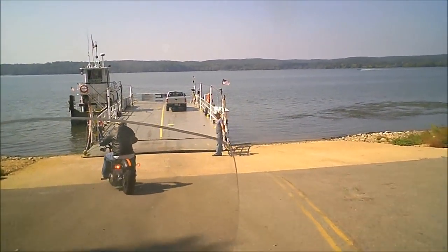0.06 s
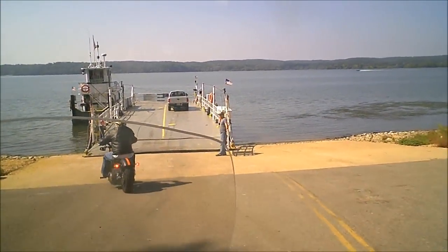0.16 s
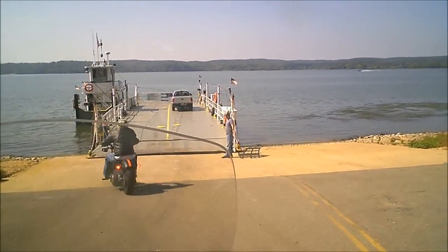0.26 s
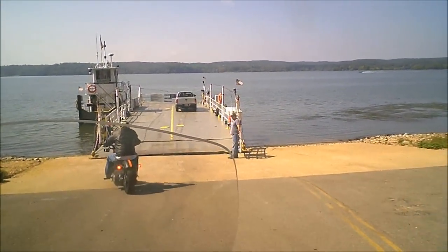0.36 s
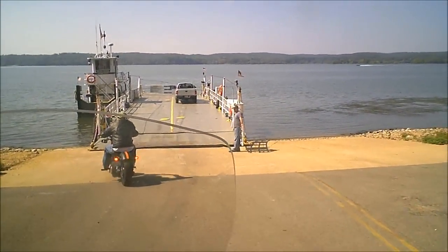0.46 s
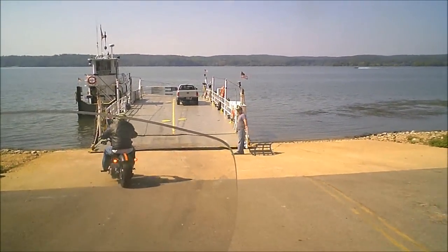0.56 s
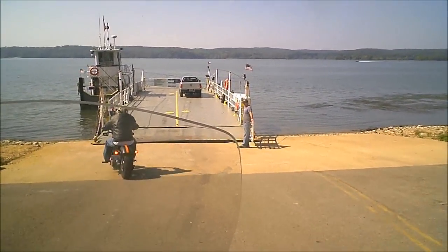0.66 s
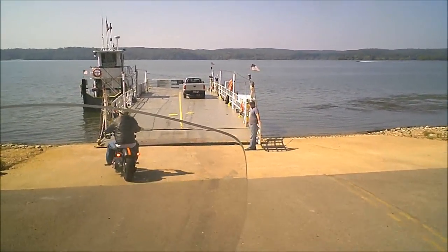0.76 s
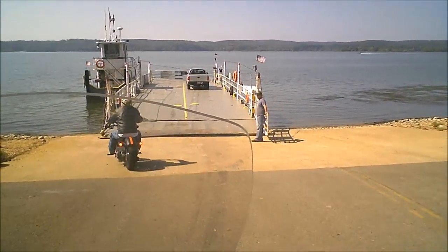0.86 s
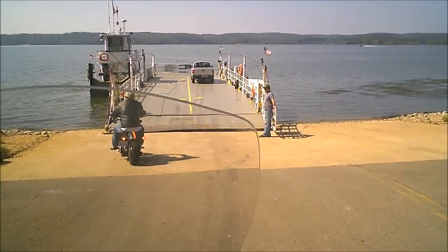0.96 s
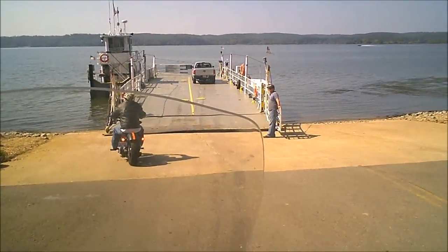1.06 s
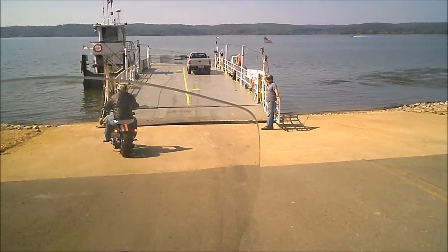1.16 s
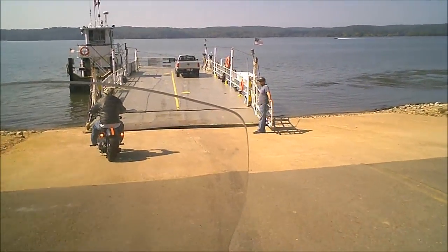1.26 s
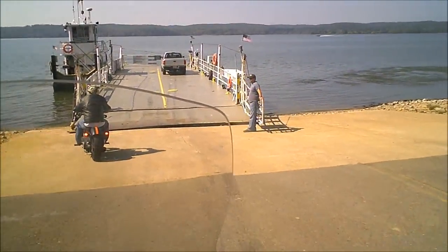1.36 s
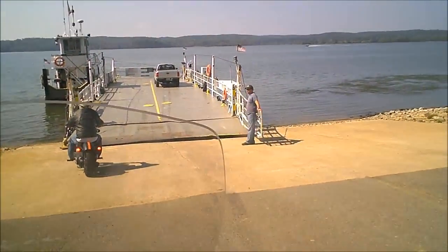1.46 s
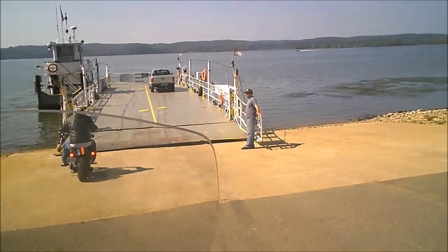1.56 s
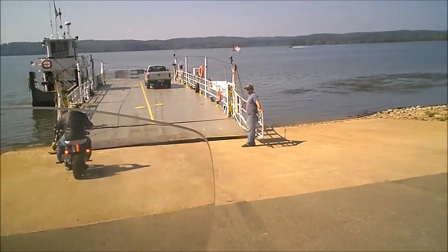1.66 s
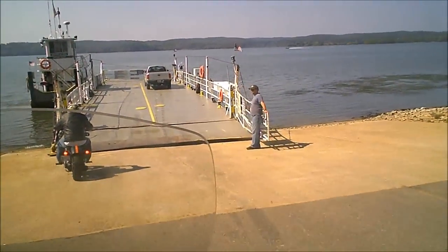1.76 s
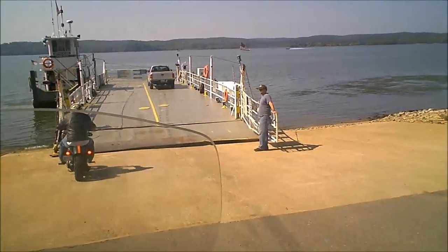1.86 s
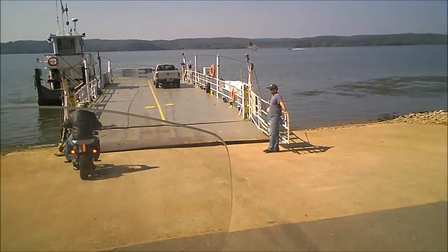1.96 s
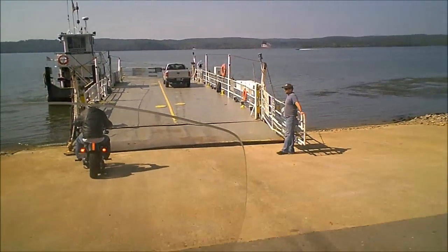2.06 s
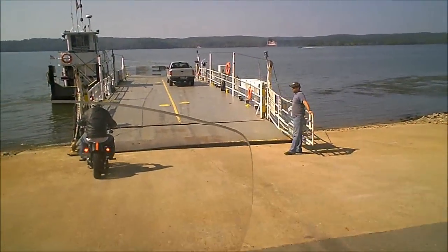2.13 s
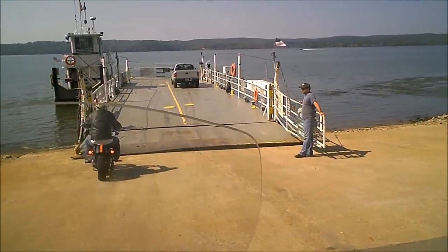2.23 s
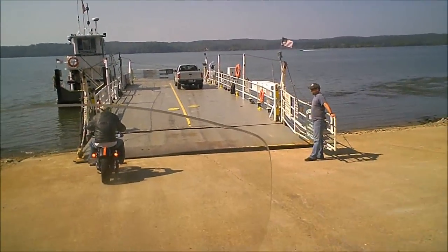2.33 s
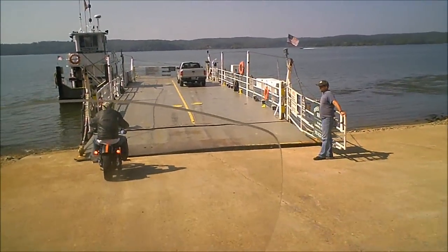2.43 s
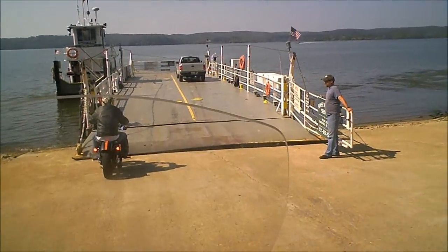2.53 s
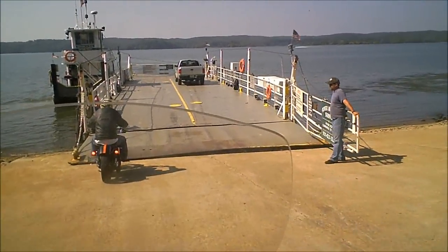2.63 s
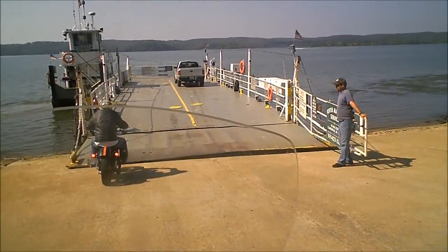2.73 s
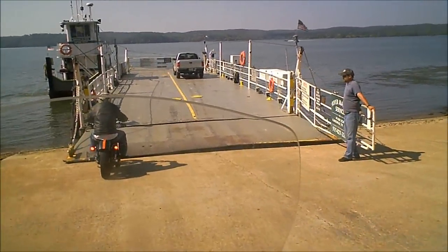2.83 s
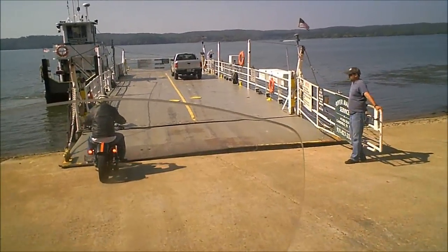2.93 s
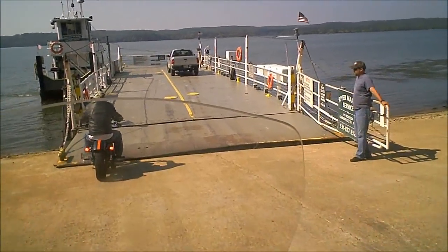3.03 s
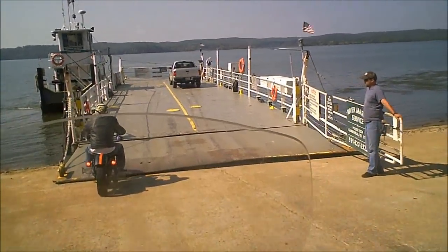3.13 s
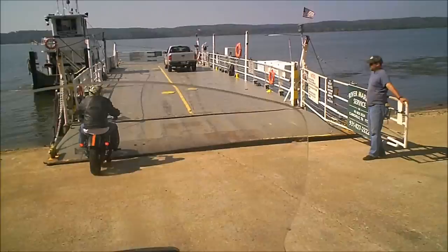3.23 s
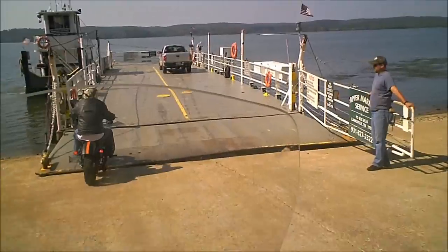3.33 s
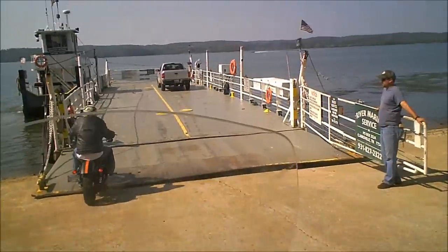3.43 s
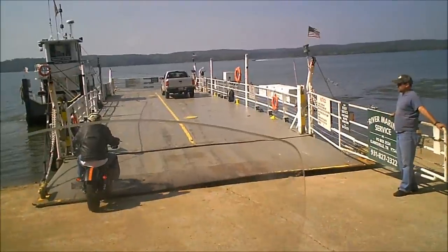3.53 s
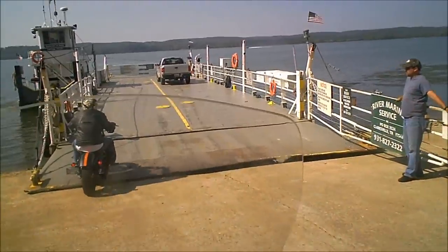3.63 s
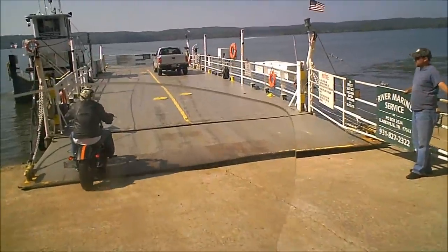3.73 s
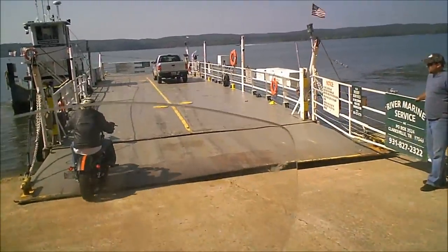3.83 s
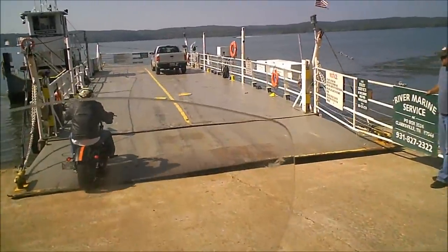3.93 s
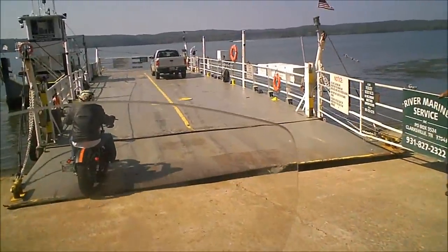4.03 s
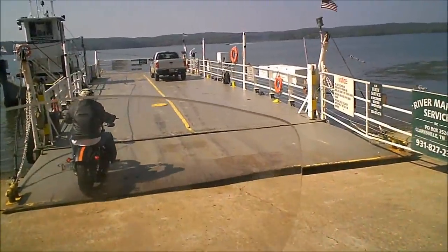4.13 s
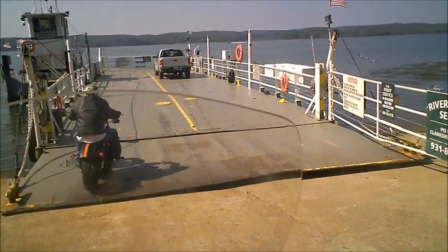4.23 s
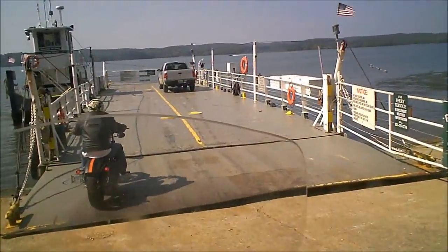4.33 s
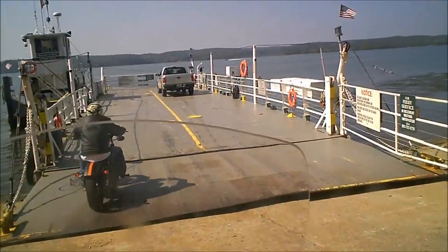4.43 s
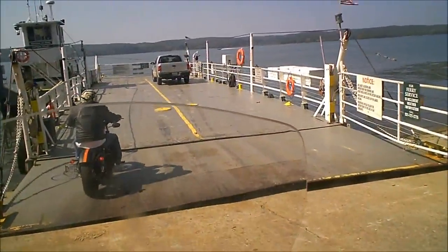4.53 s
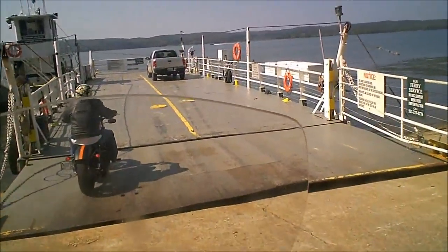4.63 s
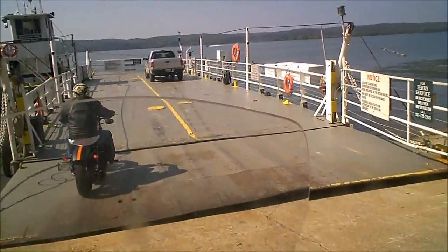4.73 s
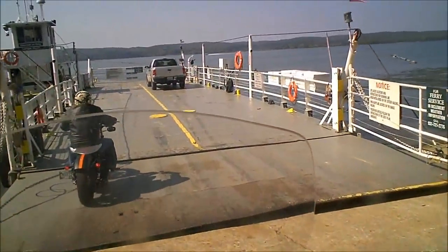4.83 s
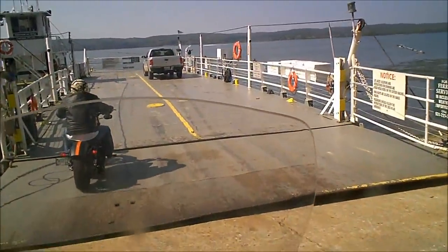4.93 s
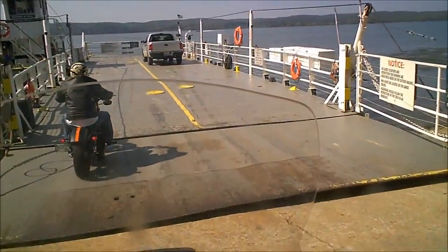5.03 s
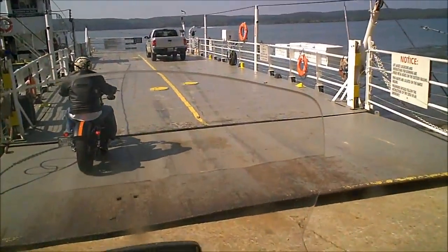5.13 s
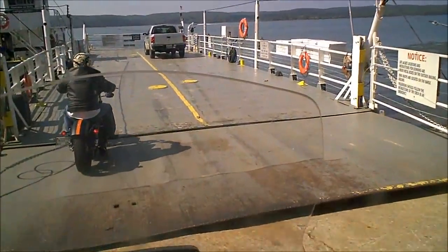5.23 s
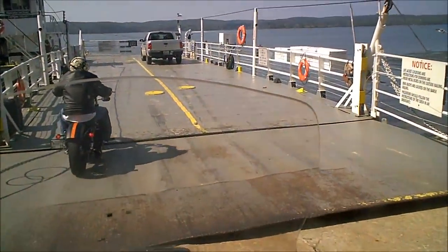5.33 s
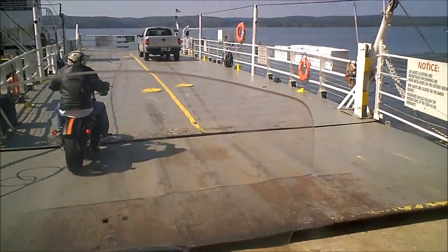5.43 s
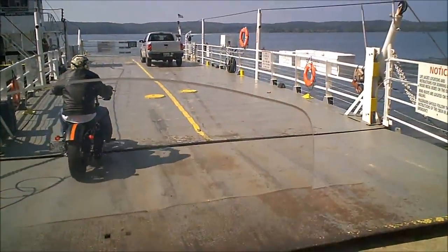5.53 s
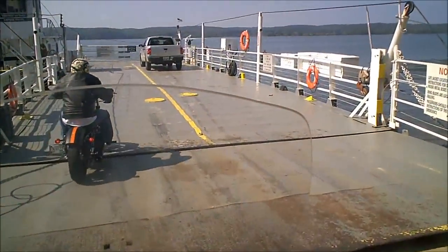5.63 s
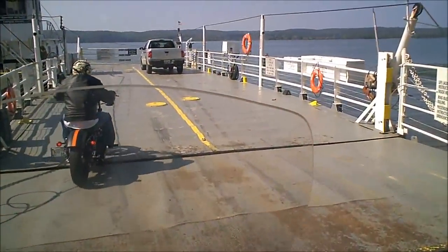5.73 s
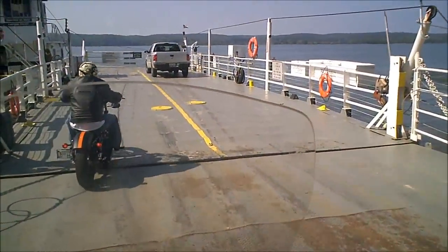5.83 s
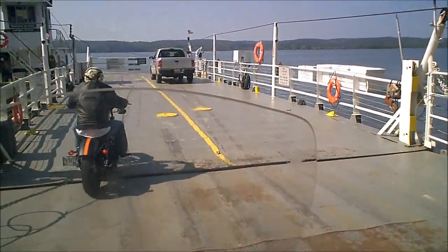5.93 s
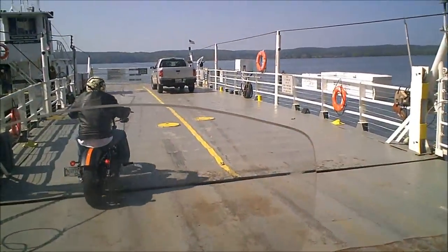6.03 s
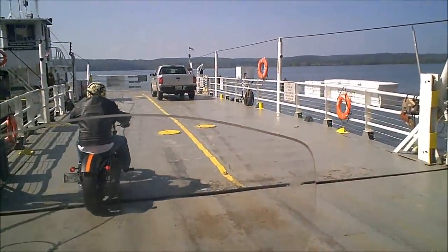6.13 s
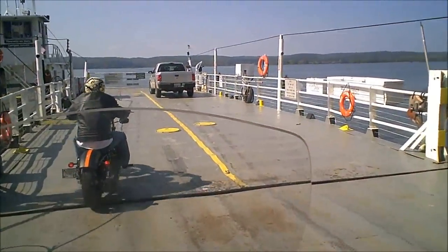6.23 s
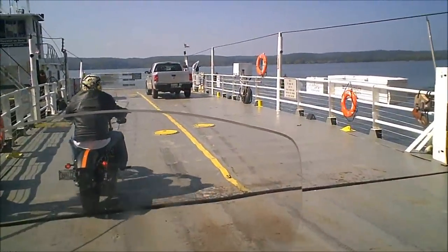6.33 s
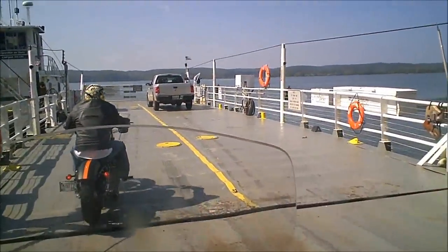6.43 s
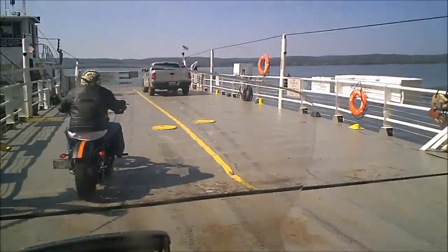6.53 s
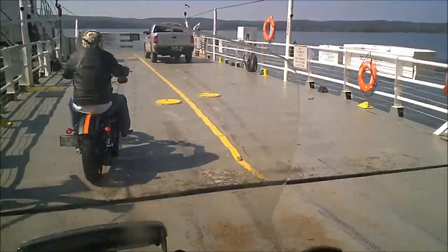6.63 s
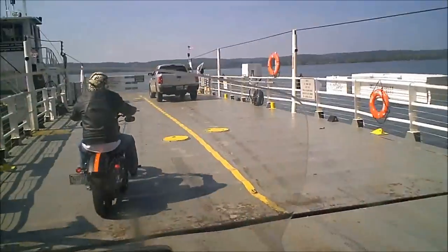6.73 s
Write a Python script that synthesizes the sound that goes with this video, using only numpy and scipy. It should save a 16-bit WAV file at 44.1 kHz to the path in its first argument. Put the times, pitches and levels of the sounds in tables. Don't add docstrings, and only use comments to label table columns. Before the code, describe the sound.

Uneven motorcycle idle grows closer and louder, then punchy exhaust bursts and ticking valve gear, with a boot scuff and a steel ramp clank.

```python
import sys
import numpy as np
from scipy import signal
from scipy.fft import rfft, irfft, next_fast_len
from scipy.io import wavfile
from scipy.ndimage import uniform_filter1d, map_coordinates

SR = 44100
rng = np.random.default_rng(int(sys.argv[2]) if len(sys.argv) > 2 else 0)


def inscribe(sig):
    pcm = np.round(np.clip(np.atleast_2d(sig).T, -1, 1) * 32767)
    wavfile.write(sys.argv[1], SR, pcm.astype(np.int16))


def boost(x):
    u = np.asarray(x, float) / 20
    return 10 ** u


N = 298998
TIME = np.arange(N) / SR


def unit(x):
    return x / np.sqrt(np.mean(x ** 2) + 1e-20)


def noise():
    return rng.standard_normal(N)


def wobble(rate_hz):
    knots = rng.standard_normal(int(N * rate_hz / SR) + 4)
    return map_coordinates(knots, [TIME * rate_hz])


def filtered(x, response):
    m = next_fast_len(N + SR // 2)
    return irfft(rfft(x, m) * response(np.fft.rfftfreq(m, 1 / SR)), m)[:N]


def colour(points):
    hz, db = np.transpose(points)
    return lambda f: boost(np.interp(np.log(f + 1), np.log(hz), db, -120, -120))


def resonant(modes):
    def response(f):
        total = 0
        for k, (hz, width_hz, db) in enumerate(modes):
            damping = 1j * f * width_hz
            total = total + (-1) ** k * boost(db) * damping / (hz * hz - f * f + damping)
        return total
    return response


def impulses(s, size):
    return np.bincount(np.clip(np.round(s * SR).astype(int), 0, N - 1), size, N)


def peak_one(response):
    peak = np.abs(filtered(impulses(np.array([1.]), [1.]), response)).max()
    return lambda f: response(f) / peak


def firings(rate_hz, scatter_s, scatter_db):
    k = np.arange(int(rate_hz * N / SR))
    luck = rng.standard_normal((len(k), 2))
    s = (k + 0.055 * (-1) ** k) / rate_hz + scatter_s * luck[:, 0]
    return impulses(s, boost(scatter_db * luck[:, 1]))


def puff(pushes, t60_s):
    return signal.lfilter([1], [1, -boost(-60 / (t60_s * SR))], pushes)


def strike(u_s, rise_s, t60_s):
    return boost(-60 * u_s / t60_s) * (1 - np.exp(-u_s / rise_s)) ** 2


# (opens [s], roll-on [s], shuts [s], opening [0-1])
BLIPS = [
    (3.6, .22, 3.945, 1.0),
    (4.79, .09, 5.215, 1.06),
    (5.4, .03, 5.64, .6),
    (5.66, .02, 5.815, .98),
    (6.39, .04, 6.8, 1.03),
]


def throttle(t):
    shut_s = .012
    opening = 0
    for on_s, roll_s, off_s, far in BLIPS:
        opening = opening + far * np.clip((t - on_s) / roll_s, 0, 1) * np.clip((off_s - t) / shut_s, 0, 1)
    return opening


# (time [s], exhaust [dB], valve gear [dB])
NEARNESS = [(0, -45.5, -48.5), (.8, -41.5, -51), (1.5, -41.5, -49.5), (2.2, -39, -47.5), (3.5, -36.5, -45),
            (3.9, -31.5, -39), (4.4, -34.5, -40.5), (4.75, -33.5, -43.5), (5.2, -30, -38),
            (5.6, -30.5, -40), (5.9, -29.5, -37.5), (6.2, -31, -40), (6.78, -29.5, -44.5)]


def nearness():
    s, exhaust_db, gear_db = np.transpose(NEARNESS)
    return np.interp(TIME, s, exhaust_db), np.interp(TIME, s, gear_db)


def drone():
    load = uniform_filter1d(throttle(TIME), size=4000)
    hz = 84.5 + 6 * load + 2.88 * wobble(3.5)
    db = nearness()[0] - 17.5 + 4.5 * load + 0.88 * wobble(8.6)
    throb = 1 + 0.14 * np.sin(2 * np.pi * 4.6 * TIME + 1.5 * wobble(2.8))
    return 1.14 * boost(db) * throb * np.sin(2 * np.pi * np.cumsum(hz) / SR)


# (frequency [Hz], level [dB per Hz])
SCRAPE = [(500, -13), (800, 2.5), (2300, -4), (3400, -1), (3900, -30)]


def scuff():
    u_s = np.maximum(TIME - 1.805, 0)
    return boost(-34.5) * strike(u_s, rise_s=.012, t60_s=.45) * unit(filtered(noise(), colour(SCRAPE)))


# (frequency [Hz], width [Hz], level [dB])
PLATE = [(1520, 55, 1), (1880, 16, 5), (2266, 53, -3), (2720, 60, -8), (3200, 70, 6), (3400, 80, 4),
         (500, 83, 0.5), (1540, 1500, -9.5)]
# (time [s], level [dB], rise [s], t60 [s])
CLANKS = [
    (6.106, -17.5, 0.0043, 0.068),
    (6.131, -23, 0.007, 0.075),
    (3.757, -36, 0.0046, 0.041),
]


def ramp():
    push = np.zeros(N)
    for s, db, rise_s, t60_s in CLANKS:
        push += boost(db) * strike(np.maximum(TIME - s, 0), rise_s, t60_s)
    plate = resonant(PLATE)
    grate = noise() * boost(2.9 * wobble(150))
    steady_ring = filtered(grate, plate).std()
    muffled = lambda f: plate(f) * (0.074 + 1 / (1 + (f / 3650) ** 30))
    return 2.8 / steady_ring * filtered(push * grate, muffled)


def mount_tick():
    snap_s, snap_hz, t60_s, level_db = 6.5838, 4000, .006, -11
    u_s = np.maximum(TIME - snap_s, 0)
    ping = np.sin(2 * np.pi * snap_hz * u_s) + 0.73 * (u_s > 0) * noise()
    return filtered(boost(level_db - 60 * u_s / t60_s) * ping, lambda f: 1 / (1 + (f / 8500) ** 6))


# (frequency [Hz], width [Hz], level [dB])
UPPER = [(2727, 180, -6), (3097, 137, 2), (3340, 190, 3.5), (3527, 178, -4)]
# (frequency [Hz], width [Hz], level [dB])
LOWER = [(1604, 121, 1.5), (1874, 145, 1), (2395, 130, -13)]


def clatter():
    load = throttle(TIME)
    upper_db = nearness()[1] + 2.5 * load
    lower_db = upper_db - 9 - 3 * load
    ticks = firings(12.0, scatter_s=0.00031, scatter_db=-1)
    ticks = ticks + 2.8 * firings(57, scatter_s=0.0038, scatter_db=2.0)
    gate = (unit(puff(ticks, t60_s=0.042)) + 2.0) * boost(0.63 * wobble(12))
    steep = lambda modes: lambda f: resonant(modes)(f) / (1 + (f / 3620) ** 40)
    upper = unit(filtered(gate * noise(), steep(UPPER)))
    lower = unit(filtered(gate * noise(), steep(LOWER)))
    return boost(upper_db) * upper + boost(lower_db + 3.5) * lower


# (frequency [Hz], width [Hz], level [dB])
PIPE = [(163, 18.5, -14.5), (234.6, 73.4, 0.5), (292.3, 66.6, -2.5), (389.2, 61, 0.5), (492.6, 126, -8.5)]


def pipe(box_hz, box_width_hz):
    return lambda f: resonant(PIPE)(f) * resonant([(box_hz, box_width_hz, 0)])(f)


# (frequency [Hz], level [dB per Hz])
RUMBLE = [(25, -49.5), (45, -36), (70, -5), (110, -0.5), (150, -0.5), (220, -2.5), (400, -30)]
# (frequency [Hz], level [dB per Hz])
RASP = [(500, 10.5), (650, -3), (800, -8), (980, -1.5), (1300, -7.5), (2500, -11.5), (3600, -25)]


def burble():
    exhaust_db, load = nearness()[0], throttle(TIME)
    burble_db = exhaust_db - 0.5 * load
    rasp_db = 0.57 * exhaust_db - 29 + 6.5 * load
    beats = firings(30.5, scatter_s=0.0051, scatter_db=4.5) + firings(21.0, scatter_s=0.0025, scatter_db=1.0)
    gate = unit(puff(beats, t60_s=0.078))
    rolling = unit(filtered((gate + 1.8) * noise(), pipe(350, 450)))
    rumble = unit(filtered((gate + 1.3) * noise(), colour(RUMBLE)))
    rasp = unit(filtered((gate + 2.6) * noise(), colour(RASP)))
    return boost(burble_db - 0.5) * rolling + boost(burble_db - 15.0) * rumble + boost(rasp_db + 1) * rasp


# (time [s], four-stroke cycles done [count])
CRANK = [(.0345, 0), (3.616, 55), (3.6962, 56), (3.7835, 57), (3.9271, 59), (4.1406, 62), (4.4055, 66),
         (4.7854, 72), (4.8733, 73), (5.0186, 75), (5.0822, 76), (5.1964, 78), (5.4349, 82), (5.6833, 86),
         (5.799, 88), (6.0904, 93), (6.497, 99), (6.793, 103)]
# (time [s], peak level [dB])
RICH = [(1.7935, -28.5), (1.8537, -28), (2.3037, -25.5), (2.5743, -24), (2.834, -22), (3.8886, -12.5),
        (4.167, -21), (4.3026, -24), (5.1415, -10), (5.1962, -18.5), (6.0904, -15.5), (6.3183, -16),
        (6.3561, -19)]


def strokes():
    rear_lag_cycles = 315 / 720
    bark_idle_db, crack_idle_db, stray_dull_db = -23, -33, -8
    when_s, cycle = np.transpose(CRANK)
    turns = (np.arange(cycle[-1])[:, None] + [0, rear_lag_cycles]).ravel()
    rear = turns % 1 > 0
    luck = rng.standard_normal((len(turns), 4))
    s = np.interp(turns, cycle, when_s)
    load = throttle(s)
    slack = np.clip(1 - .7 * load ** 2, 0, 1)
    db = np.interp(s, TIME, nearness()[0]) + 12 + 9.5 * load
    db = db + slack * (-7 * rear + 2.4 * luck[:, 0])
    bark_db = bark_idle_db + 14 * load ** 2 - 2 * rear + 2.0 * luck[:, 1]
    idle_hush_db = -7 * (1 - load ** 2)
    crack_db = crack_idle_db + 4 * load ** 2 + idle_hush_db + 3 * luck[:, 2]
    fired = np.transpose([s + .0015 * slack * luck[:, 3], db, bark_db, crack_db])
    stray = [(t, level, bark_idle_db + stray_dull_db, crack_idle_db + stray_dull_db) for t, level in RICH]
    return np.vstack([fired, stray]).T


# (delay [s], level [dB])
ECHOES = [(.0063, -22.5), (0.0125, -10), (0.025, -21)]
# (frequency [Hz], level [dB per Hz])
CRACK = [(2000, -40), (3800, 2.5), (6000, -10), (9000, -15), (15000, -36)]
# (frequency [Hz], width [Hz], level [dB])
THUMP = [(160, 85, 0)]


def pops():
    s, db, bark_db, crack_db = strokes()
    returns = [(0, 0.0067), *ECHOES]
    luck = rng.standard_normal((len(s), len(returns), 2))
    luck[:, 0] = 0

    def train(level_db):
        total = 0
        for k, (lag_s, loss_db) in enumerate(returns):
            arrival_s = s + lag_s + 0.0005 * luck[:, k, 0]
            total = total + impulses(arrival_s, boost(level_db + loss_db + 3.6 * luck[:, k, 1]))
        return total

    swirl = puff(impulses(s, boost(db - 31)), t60_s=0.1) * noise()
    body = filtered(train(db - 15.5) + swirl, peak_one(pipe(380, 500)))
    bark = filtered(train(db + bark_db + 2.5), peak_one(resonant([(664, 345, 1), (1050, 773, -6)])))
    crack = filtered(train(db + crack_db + 9.5), peak_one(colour(CRACK)))
    blast = lambda f: resonant([(335, 330, 0)])(f) ** 3 / (1 + 1j * f / 700) ** 2
    punch = filtered(train(db - 1.7), peak_one(blast))
    thump = filtered(impulses(s, boost(db - 16)), peak_one(lambda f: resonant(THUMP)(f) ** 2))
    return body + bark + crack + punch + thump


def scene():
    return (drone() + scuff() + ramp() + mount_tick() + clatter() + burble() + pops())[None]


# (frequency [Hz], level [dB per Hz])
GRIT = [(2500, -23), (3800, 8), (4600, 6), (6000, 3), (9000, -0.5), (15800, 0)]


def converter_grit(x):
    slope = np.abs(filtered(x, lambda f: (f / 1500) ** 1.06 / (1 + (f / 4000) ** 4)))
    step = uniform_filter1d(slope, size=96) * boost(1.45 * wobble(60))
    return boost(-29) * step * unit(filtered(noise(), colour(GRIT)))


def band_limit(x):
    return signal.sosfilt(signal.butter(12, 16510, fs=SR, output="sos"), x)


def record(dry):
    mix = dry + converter_grit(dry[0])
    return band_limit(mix)


dry = scene()
out = record(dry)
inscribe(out)
```